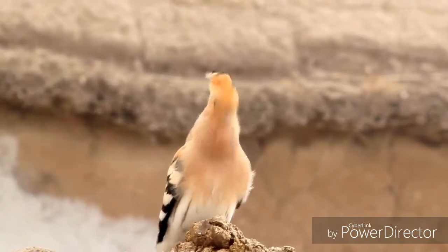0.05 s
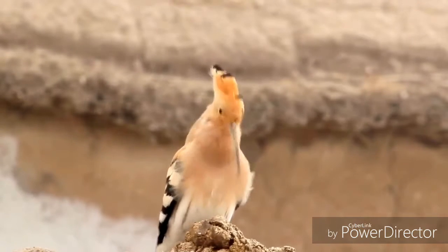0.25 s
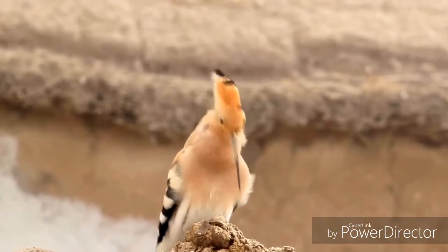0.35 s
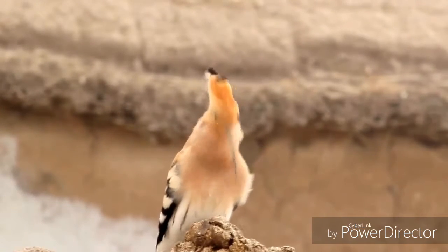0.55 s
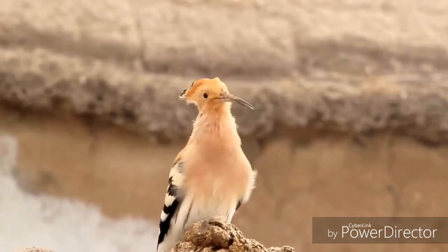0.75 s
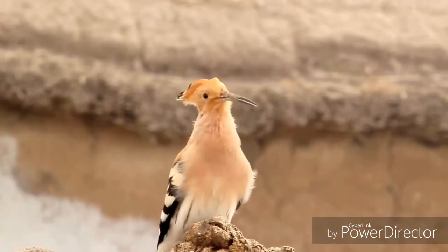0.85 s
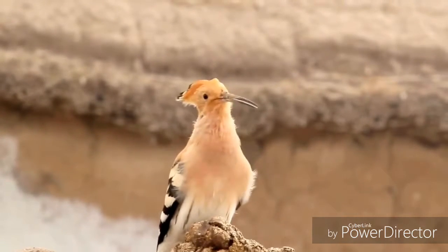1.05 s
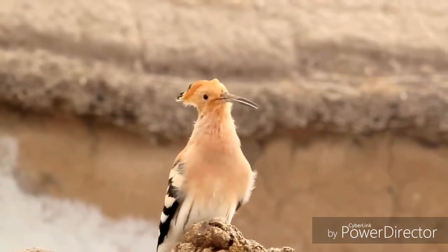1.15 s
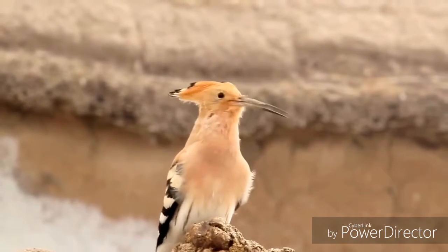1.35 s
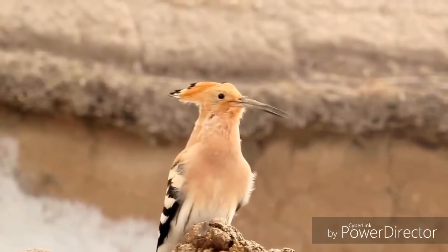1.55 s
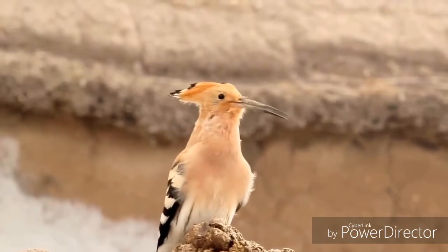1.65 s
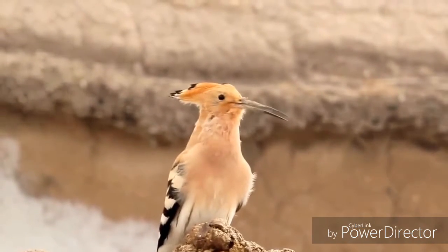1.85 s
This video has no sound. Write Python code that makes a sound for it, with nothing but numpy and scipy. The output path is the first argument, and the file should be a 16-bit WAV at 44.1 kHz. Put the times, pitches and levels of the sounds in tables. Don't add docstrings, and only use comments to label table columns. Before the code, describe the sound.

A hoopoe close by hoots three quick, hollow, nearly pure notes, echoing faintly off walls, with a dull knock near the first; sparrows chirp throughout and continue afterward over quiet outdoor hiss.

```python
import sys
import numpy as np
from scipy import signal
from scipy.fft import rfft, irfft
from scipy.io import wavfile
from scipy.ndimage import uniform_filter1d

SR = 44100
rng = np.random.default_rng(int(sys.argv[2]) if len(sys.argv) > 2 else 0)


def pcm_store(signal):
    levels = np.round(np.clip(np.atleast_2d(signal), -1, 1) * 32767)
    wavfile.write(sys.argv[1], SR, levels.astype(np.int16).T)


def ratio(d):
    e = np.asarray(d, float) / 20
    return 10 ** e


N = 83790


def evened(x):
    return x / np.sqrt(np.mean(x ** 2) + 1e-20)


def add(mix, start_s, sound):
    at = round(start_s * SR)
    part = mix[max(at, 0):][:len(sound) + min(at, 0)]
    part += sound[max(-at, 0):][:len(part)]


def coloured(points, size):
    f, level_db = np.transpose(points)
    hz = np.fft.rfftfreq(size, 1 / SR)
    gain = ratio(np.interp(np.log(hz + 1), np.log(f), level_db))
    return evened(irfft(rfft(rng.standard_normal(size)) * gain, size))


def wobble(size, hz):
    steep = signal.butter(4, hz, fs=SR, output="sos")
    settled = signal.sosfilt(steep, rng.standard_normal(size + 4000))[4000:]
    return evened(settled)


def fuzzy(hz, width_hz, size):
    slow = wobble(size, width_hz / 2) + 1j * wobble(size, width_hz / 2)
    return (slow * np.exp(2j * np.pi * hz * np.arange(size) / SR)).real


def voice(hz, partial_db, burr):
    burr_hz = 480
    beat = 2 * np.pi * burr_hz * np.arange(len(hz)) / SR + 1.5 * wobble(len(hz), 90)
    side_lines = .6 * np.exp(-1j * beat) + np.exp(1j * beat)
    shake = 1 + burr * (side_lines + wobble(len(hz), 300))
    turn = np.exp(2j * np.pi * np.cumsum(hz) / SR)
    partials = [ratio(db) * (shake * turn ** (k + 1)).imag for k, db in enumerate(partial_db)]
    return np.sqrt(2) * sum(partials)


def room(x, t60_s):
    t = np.arange(SR // 2) / SR
    build_up = np.clip(t / 0.00098, 0, 1)
    tail = rng.standard_normal(len(t)) * ratio(-60 * t / t60_s) * build_up
    return signal.fftconvolve(x, tail / np.linalg.norm(tail))[:N]


def wash():
    # frequency in Hz, level in dB per Hz.
    air = [(15, -45), (25, -14), (75, -8), (288, 1), (1070, -4), (1520, -3.5), (3150, -4), (4710, -7.5),
           (15400, -25.5)]
    # frequency in Hz, width in Hz, level in dB, change in dB per second.
    hums = [(91.6, 13.6, -69, -10), (147.57, 18.8, -68, -2.5)]
    level_db = -57 + 0.089 * wobble(N, 3.34)
    out = ratio(level_db) * coloured(air, N)
    for hz, width_hz, hum_db, change_db in hums:
        out = out + ratio(hum_db + change_db * np.arange(N) / SR) * fuzzy(hz, width_hz, N)
    return out


def knocks():
    # start in seconds, blow level in dB, tail level in dB.
    strikes = [
        (-.04, -66, -41.5),
        (0.2624, -16.5, -36.5),
        (0.314, -28.5, -43.5),
        (1.341, -40, -57),
    ]
    # frequency in Hz, level in dB.
    blow_modes = [(1112.4, 6), (1658, -1.5), (535.8, -5)]
    # frequency in Hz, level in dB.
    tail_colour = [(200, -21.5), (1050, 5.5), (1700, -4.5), (2300, -6.5), (5000, -20.5), (9000, -64)]
    # frequency in Hz, width in Hz, level in dB.
    yard_modes = [(840.1, 56.7, -2), (1075.8, 45, -3.5), (1310, 52.4, -4), (1720.6, 75, -3.5)]
    blow_t60_s, tail_t60_s, tail_rise_s = 0.01288, 0.564, 0.0056
    out, t = np.zeros(N), np.arange(SR // 2) / SR
    blow = sum(ratio(db - 60 * t / blow_t60_s) * np.sin(2 * np.pi * hz * t) for hz, db in blow_modes)
    blow = blow * np.minimum(t / 0.001925, 1)
    for start_s, blow_db, tail_db in strikes:
        ringing = sum(ratio(db) * fuzzy(hz, width_hz, len(t)) for hz, width_hz, db in yard_modes)
        scatter = 0.837 * coloured(tail_colour, len(t)) + 0.366 * ringing
        decay_db = tail_db - 60 * t / tail_t60_s + 0.68 * wobble(len(t), 53)
        tail = np.minimum(t / tail_rise_s, 1) * scatter * ratio(decay_db)
        add(out, start_s, ratio(blow_db) * blow + tail)
    return out


def rustles():
    # start in seconds, length in seconds, level in dB, low edge in Hz, high edge in Hz.
    puffs = [(.17, .06, -63, 5500, 9500), (.38, .13, -58, 2000, 5500), (1.105, .035, -59, 3000, 7500),
             (1.2, .17, -57, 1100, 4500), (1.358, .014, -57, 1800, 11000), (1.64, .18, -62, 5000, 8000),
             (1.442, .055, -49, 2700, 5200), (1.315, .1, -54, 2500, 5000), (1.5, .07, -59, 2500, 3800),
             (0, .11, -57, 3000, 5500), (.735, .025, -63, 5000, 9000)]
    out = np.zeros(N)
    for start_s, length_s, level_db, low_hz, high_hz in puffs:
        u = np.arange(0, length_s, 1 / SR) / length_s
        band = [(.8 * low_hz, -40), (low_hz, 0), (high_hz, -4), (1.25 * high_hz, -40)]
        flutter = ratio(level_db + 1.8 * wobble(len(u), 70))
        add(out, start_s, flutter * np.sin(np.pi * u) * coloured(band, len(u)))
    return out


def sparrows():
    # time in seconds, pitch in Hz, level in dB.
    rough_1 = [(0.024, 3041, -53), (0.036, 3767, -50.5), (0.046, 3452, -54.5), (0.052, 3641, -44.5),
               (0.064, 3492, -53), (0.07, 2955, -54.5), (0.083, 3707, -45.5), (0.095, 3169, -47),
               (0.122, 2817, -59)]
    rough_2 = [(0.21, 3624, -56), (0.22, 4107, -47), (0.227, 4418, -40.5), (0.234, 4311, -50.5),
               (0.242, 3984, -37.5), (0.247, 3545, -47.5), (0.26, 2526, -59)]
    rough_3 = [(0.275, 2771, -59), (0.284, 2944, -49.5), (0.295, 3126, -48.5), (0.304, 2876, -42.5),
               (0.315, 2628, -48.5), (0.334, 2331, -54.5)]
    rough_4 = [(0.543, 3424, -52.5), (0.551, 5906, -54), (0.557, 5674, -47), (0.562, 6358, -54.5),
               (0.568, 4534, -43), (0.577, 4574, -39.5), (0.586, 4059, -40), (0.593, 3120, -44.5),
               (0.598, 2672, -42.5)]
    rough_5 = [(0.59, 3686, -42.0), (0.601, 4668, -48.5), (0.607, 3246, -39), (0.614, 3571, -42.0),
               (0.621, 3716, -38), (0.633, 3255, -39.5), (0.642, 2879, -38.5), (0.654, 2626, -49),
               (0.668, 2288, -66)]
    rough_6 = [(0.879, 3923, -69), (0.887, 5740, -49), (0.897, 6420, -60.0), (0.901, 4637, -52),
               (0.91, 4041, -45.5), (0.914, 4520, -46.5), (0.92, 3412, -51.5), (0.927, 3635, -49)]
    rough_7 = [(0.926, 3614, -51), (0.937, 4219, -45.5), (0.943, 3410, -49.5), (0.951, 3199, -49.5),
               (0.964, 2970, -52), (0.98, 3247, -48.5), (0.991, 3673, -56.5), (1.002, 2792, -55),
               (1.015, 2860, -74.5)]
    rough_8 = [(1.322, 4720, -56.5), (1.33, 5700, -48.5), (1.338, 6250, -50.5), (1.345, 4838, -46),
               (1.348, 4117, -40), (1.357, 4210, -43.5), (1.364, 4300, -109.5)]
    rough_9 = [(1.362, 3370, -51.5), (1.372, 3850, -43), (1.375, 4784, -46.5), (1.384, 3668, -42),
               (1.39, 2922, -46.5), (1.397, 3500, -49), (1.405, 3492, -49.5), (1.417, 3127, -55.5),
               (1.434, 2873, -55.5)]
    rough_10 = [(1.648, 4342, -60.5), (1.661, 4490, -39), (1.674, 4360, -63), (1.688, 4380, -50),
                (1.698, 4756, -45), (1.703, 3800, -47), (1.715, 3353, -49), (1.724, 2410, -42.5),
                (1.733, 2646, -57.5)]
    # time in seconds, pitch in Hz, level in dB.
    clear_1 = [(1.124, 2367, -61), (1.138, 4051, -42.5), (1.143, 5034, -37.5), (1.152, 4588, -43),
               (1.163, 4602, -35.5), (1.168, 2679, -51.5), (1.174, 4094, -33), (1.18, 4640, -47),
               (1.188, 4494, -53)]
    clear_2 = [(1.187, 4329, -47.5), (1.192, 3998, -30.5), (1.198, 4137, -39.5), (1.202, 2805, -37),
               (1.209, 3888, -42.5), (1.213, 3436, -39.0), (1.219, 3289, -41), (1.234, 3320, -50),
               (1.244, 2803, -51)]
    clear_3 = [(1.602, 3577, -54), (1.61, 4182, -39.5), (1.622, 4036, -38), (1.63, 4736, -37),
               (1.632, 3730, -42.5), (1.662, 2332, -55)]
    clear_4 = [(1.66, 2272, -50), (1.674, 2582, -49.0), (1.7, 2790, -42.5), (1.711, 3349, -46),
               (1.725, 3790, -61.5), (1.739, 3050, -48.5), (1.751, 3236, -49.5), (1.765, 3881, -57.5),
               (1.772, 3570, -50.5)]
    # time in seconds, pitch in Hz, level in dB.
    thin = [
        [(.503, 4900, -63), (.517, 4780, -57), (.535, 3900, -56), (.553, 3300, -58)],
        [(.697, 3620, -62), (.708, 3550, -58), (.74, 2880, -61)],
        [(1.015, 3050, -62), (1.045, 3700, -60), (1.068, 3480, -61), (1.097, 2950, -61)],
        [(1.022, 4130, -62), (1.045, 4250, -61), (1.077, 4050, -62)],
        [(1.243, 2950, -57), (1.266, 2300, -60), (1.285, 2050, -56), (1.322, 1830, -57)],
        [(1.785, 4230, -60), (1.81, 4260, -53), (1.821, 4150, -56), (1.829, 3520, -53)],
        [(1.857, 2850, -57), (1.874, 3150, -55), (1.886, 3620, -58), (1.898, 3550, -55)],
    ]
    burred = [rough_1, rough_2, rough_3, rough_4, rough_5, rough_6, rough_7, rough_8, rough_9, rough_10]
    clear = [clear_1, clear_2, clear_3, clear_4] + thin
    out = np.zeros(N)
    for song, burr in [(w, .38) for w in burred] + [(w, .11) for w in clear]:
        s, hz, level_db = np.transpose(song)
        t = np.arange(s[0], s[-1], 1 / SR)
        edge = np.clip(np.minimum(t - s[0], s[-1] - t) / 0.0013, 0, 1)
        path = uniform_filter1d(np.interp(t, s, hz), size=80, mode="nearest")
        loudness = edge * ratio(np.interp(t, s, level_db))
        add(out, s[0], loudness * voice(path, [0, -27], burr))
    return out


def call(mix, row, partial_db, burr):
    start_s, length_s, level_db, from_hz, to_hz = row
    u = np.arange(0, length_s, 1 / SR) / length_s
    glide_hz = from_hz + (to_hz - from_hz) * np.sin(1.7 * u)
    hz = glide_hz * (1 + 0.0543 * burr * wobble(len(u), 107.4))
    add(mix, start_s, ratio(level_db) * np.sin(np.pi * u) * voice(hz, partial_db, burr))


def short_calls():
    # start in seconds, length in seconds, level in dB, from pitch in Hz, to pitch in Hz.
    whistles = [(1.826, .04, -57, 4230, 4250), (.381, .014, -56, 6500, 6400), (.249, .028, -49, 4800, 4000),
                (1.59, .022, -60, 4900, 7600), (1.772, .016, -53, 3250, 2800),
                (1.222, .026, -55, 1850, 2300), (1.256, .044, -56, 3200, 3450),
                (1.357, .025, -56, 1900, 2050), (1.308, .017, -55, 5700, 6500),
                (1.412, .03, -59, 1750, 1850), (1.8, .017, -59, 3050, 3300), (1.832, .014, -59, 3300, 3100),
                (1.755, .014, -59, 4230, 4250), (.423, .012, -62, 6600, 6300),
                (.469, .012, -62, 6500, 6300), (1.558, .02, -58, 3100, 3550),
                (1.652, .045, -63, 5800, 8800), (1.118, .018, -59, 3300, 4300)]
    # start in seconds, length in seconds, level in dB, from pitch in Hz, to pitch in Hz.
    hoarse = [
        (.466, .034, -51, 1330, 1850),
        (1.24, .06, -57, 1380, 1150),
        (1.305, .05, -50, 1250, 1600),
        (1.438, .058, -48.5, 1100, 1600),
    ]
    hoarse_partial_db = [-6, 0, -11, -22]
    out = np.zeros(N)
    for row in whistles:
        call(out, row, [0], burr=0.18)
    for row in hoarse:
        call(out, row, hoarse_partial_db, burr=.38)
    return out


def crow():
    crow_partial_db = [-13, 0, -5]
    out, pitch_hz, sag = np.zeros(N), 809.4, .025
    call(out, (0.46, 0.519, -59.5, pitch_hz, pitch_hz * (1 - sag)), crow_partial_db, burr=0.2975)
    return out * ratio(4 * np.tanh(wobble(N, 25)))


def birds():
    near = sparrows() + short_calls()
    twigs = ratio(-11) * room(near, t60_s=.035)
    hedge = ratio(-11) * room(near, t60_s=.22)
    return near + twigs + crow() + hedge


def hoopoe():
    # start in seconds, length in seconds, level in dB, pitch in Hz, glide as a share of pitch.
    hoots = [
        (0.191, 0.1202, -27.5, 595.8, 0.07),
        (0.401, 0.1036, -26, 594.4, 0.02),
        (0.591, 0.10996, -27, 593.1, 0.03),
    ]
    overtone_db = [-29, -30]
    scoop, scoop_s, lift_share, lift_s = 0.2106, 0.006094, 0.0173, 0.01746
    swell_share, swell_power, release_s = 0.766, 1.105, 0.0326
    ring_db, ring_t60_s, ring_delay_s = -12, 0.235, .028
    dry = np.zeros(N)
    for start_s, length_s, level_db, pitch_hz, glide in hoots:
        t = np.arange(0, length_s + 0.21, 1 / SR)
        u = np.minimum(t, length_s)
        lift = lift_share * np.exp(-abs(t - length_s) / lift_s)
        lift = lift - glide * 0.298 * (t > length_s)
        hz = pitch_hz * (1 - scoop * np.exp(-t / scoop_s) + lift + glide * (u / length_s - .6))
        rise = np.sin(np.pi / 2 * np.minimum(t / (swell_share * length_s), 1)) ** swell_power
        breath = rise * np.sin(np.pi / 2 * np.minimum((length_s - u) / release_s, 1))
        hold = ratio(-60 / (ring_t60_s * SR))
        ring = signal.lfilter([1 - hold], [1, -hold], np.interp(t - ring_delay_s, t, breath))
        note = breath * voice(hz, [0] + overtone_db, burr=0)
        note = note - ratio(ring_db) * ring * voice(hz, [0], burr=0)
        add(dry, start_s, ratio(level_db) * note)
    out = dry + ratio(-27) * room(dry, t60_s=.7)
    add(out, .158, ratio(-26.5) * dry)
    return out


def scene():
    return (wash() + knocks() + rustles() + birds() + hoopoe())[None]


def roll_off(x):
    return signal.sosfilt(signal.butter(12, 15500, fs=SR, output="sos"), x)


def record(dry):
    return roll_off(dry)


dry = scene()
out = record(dry)
pcm_store(out)
```